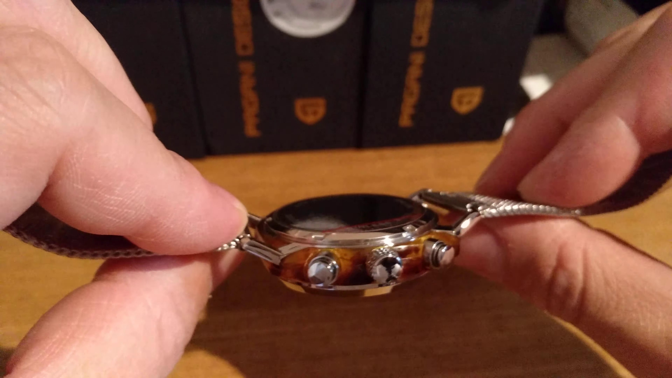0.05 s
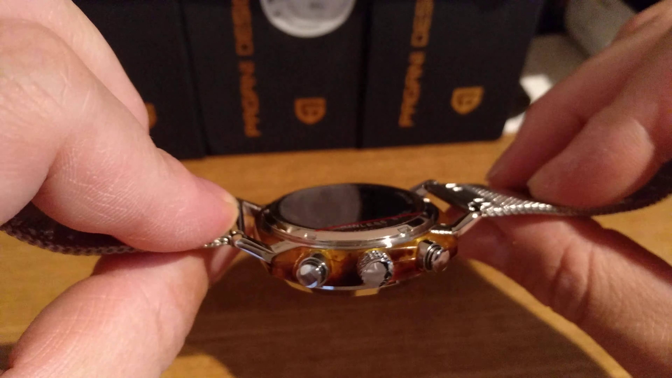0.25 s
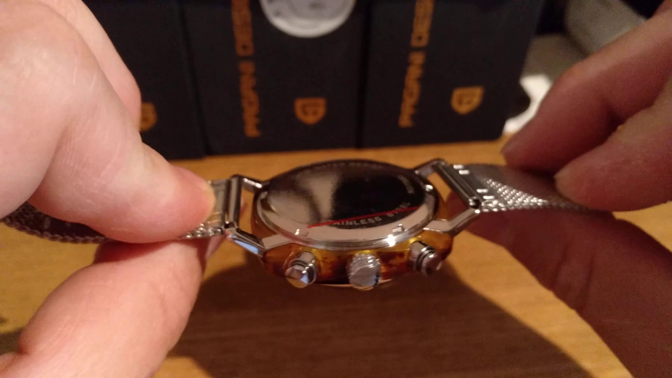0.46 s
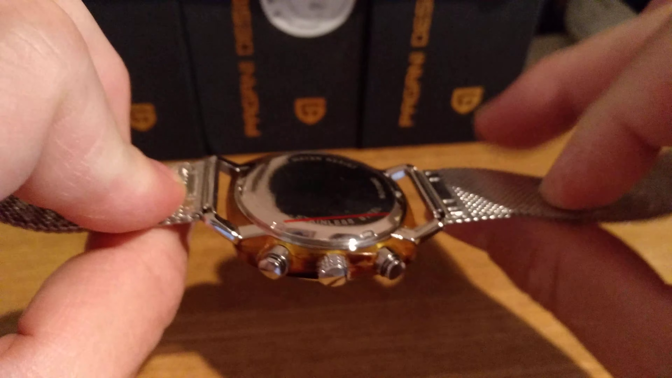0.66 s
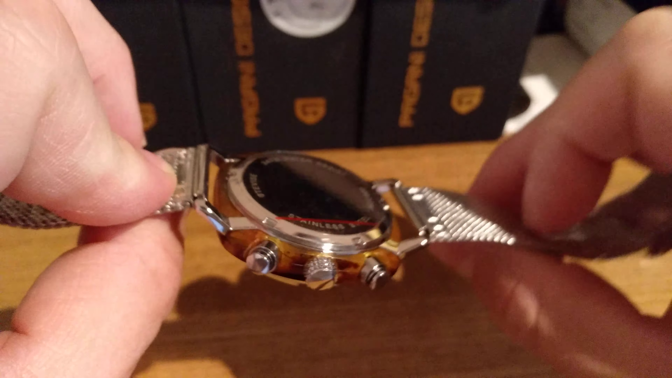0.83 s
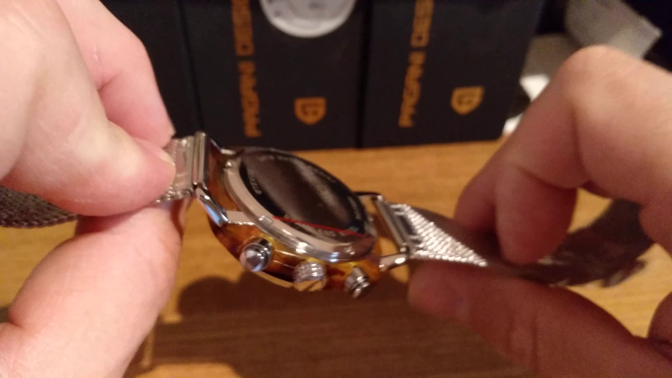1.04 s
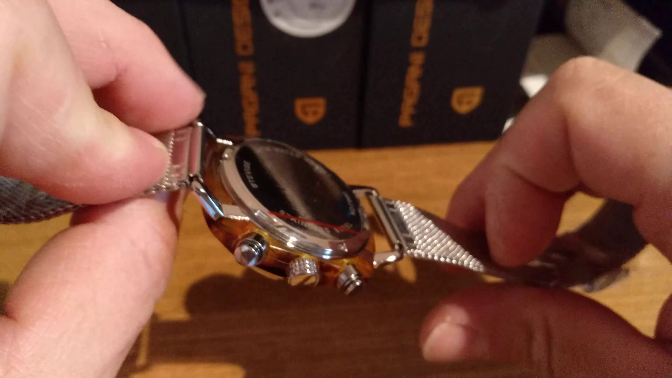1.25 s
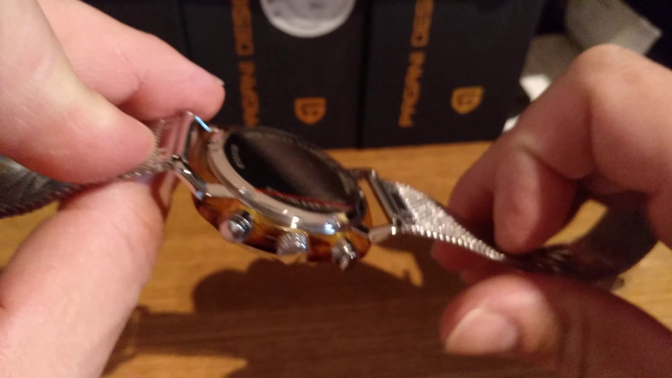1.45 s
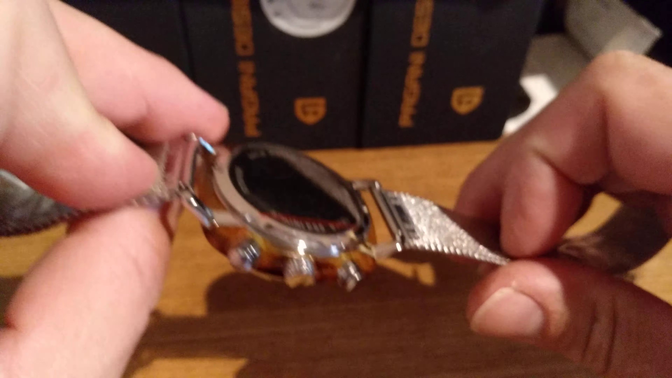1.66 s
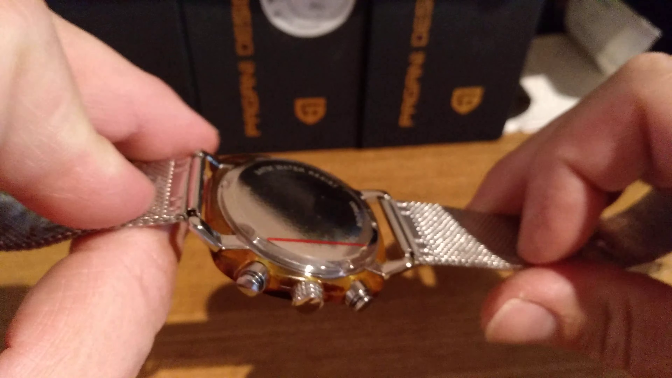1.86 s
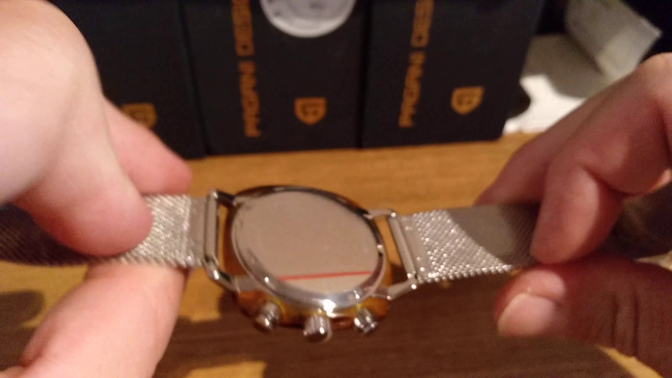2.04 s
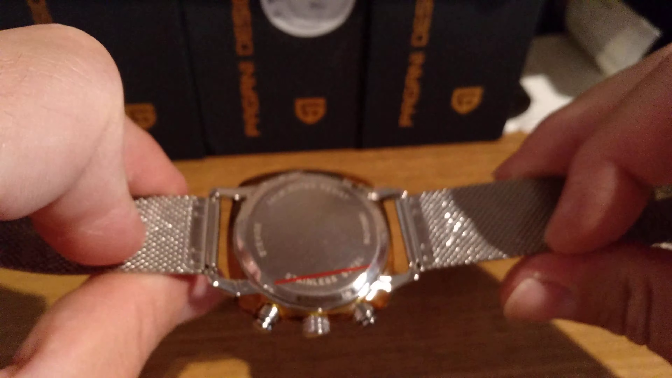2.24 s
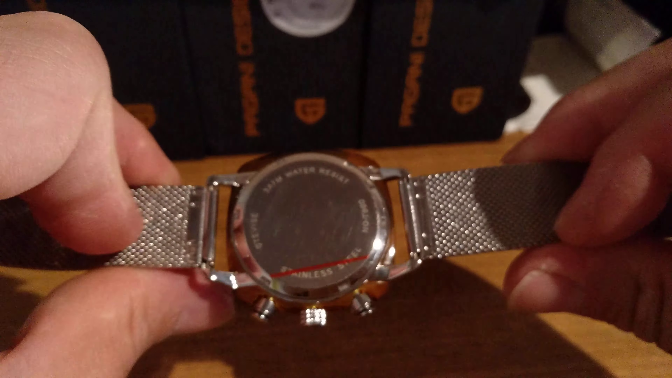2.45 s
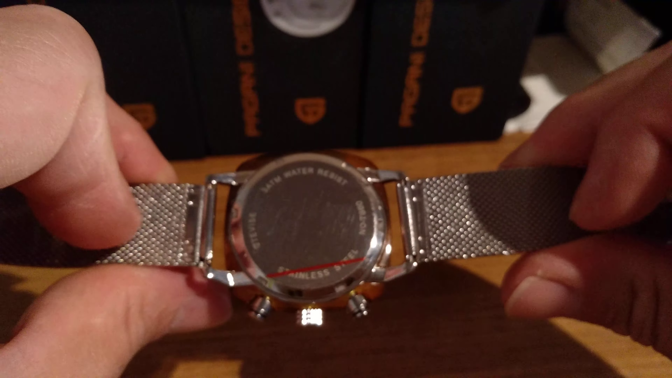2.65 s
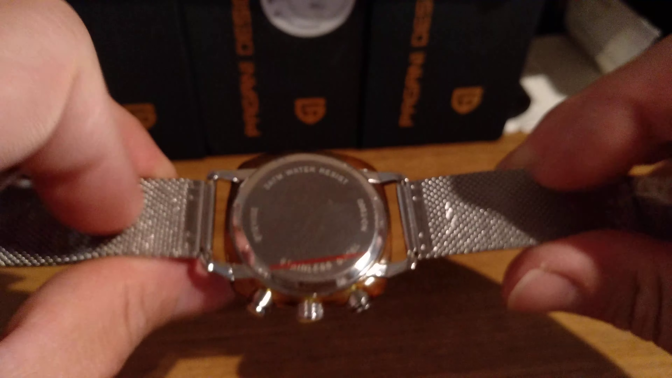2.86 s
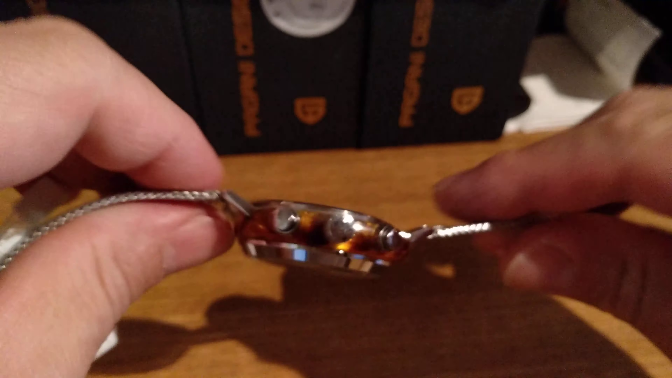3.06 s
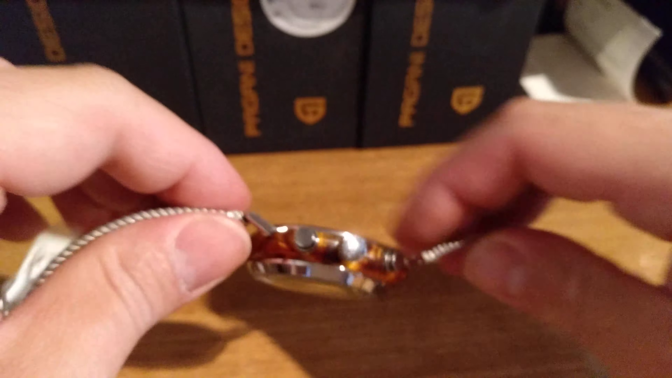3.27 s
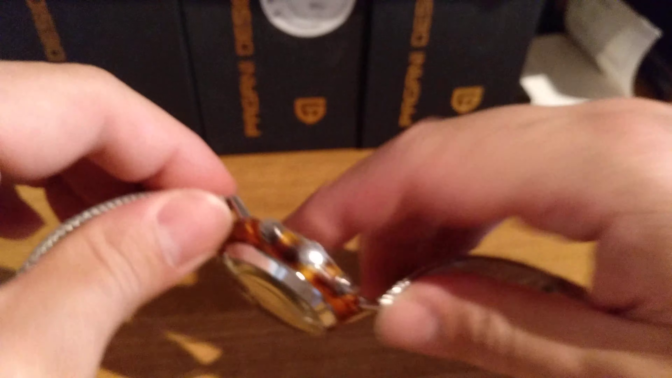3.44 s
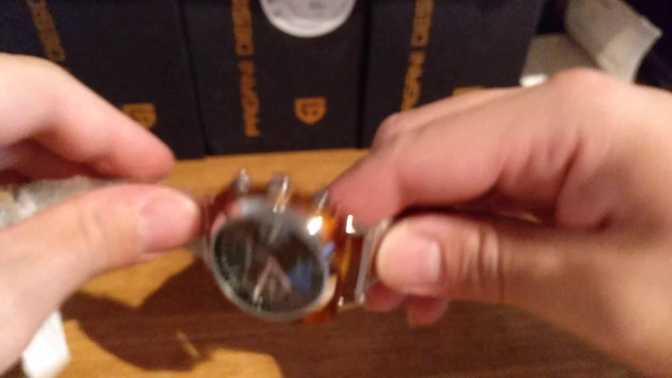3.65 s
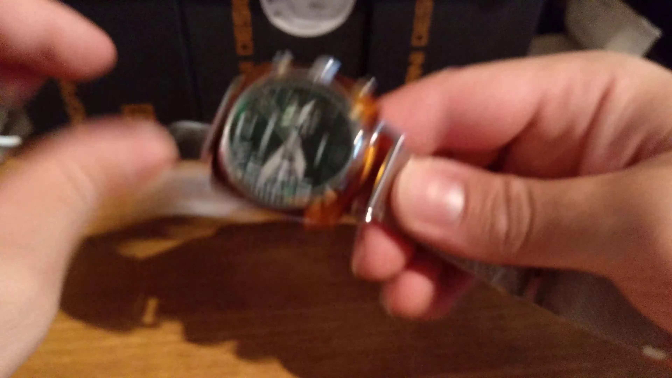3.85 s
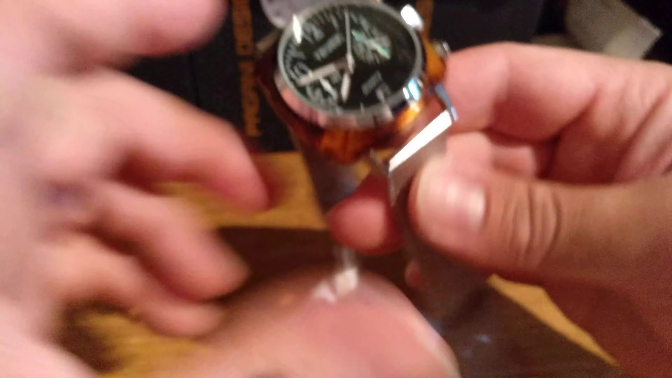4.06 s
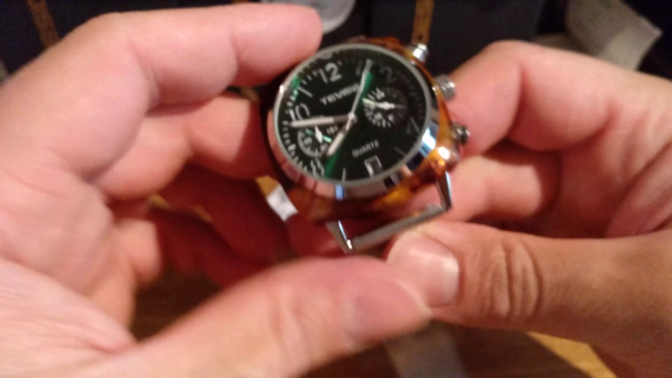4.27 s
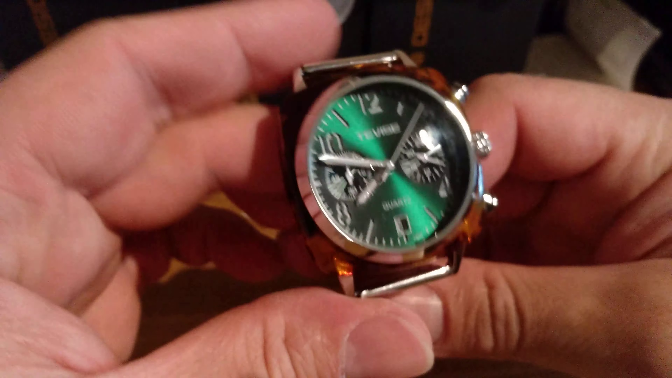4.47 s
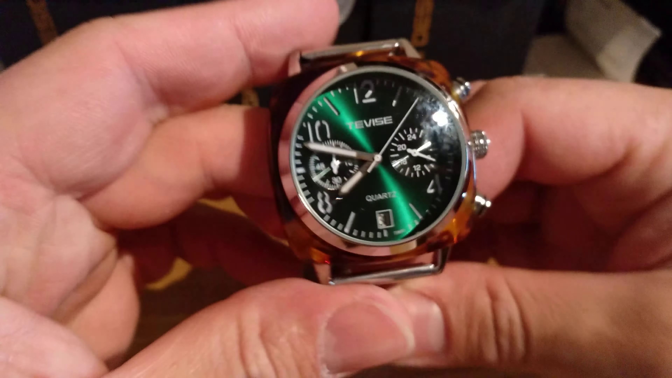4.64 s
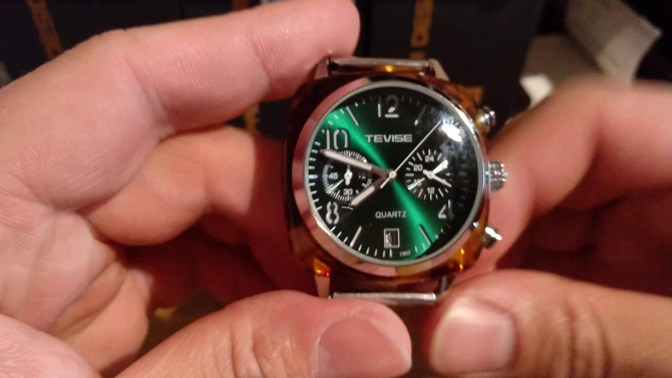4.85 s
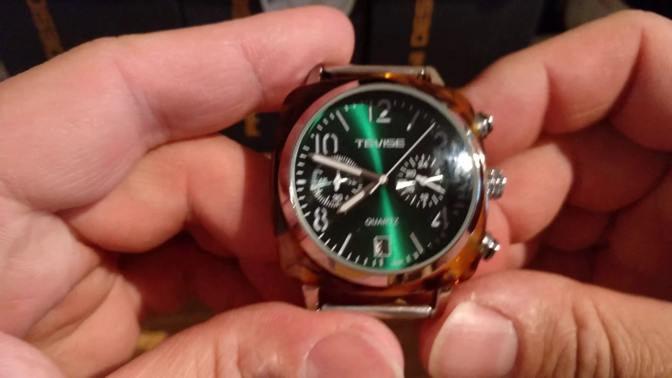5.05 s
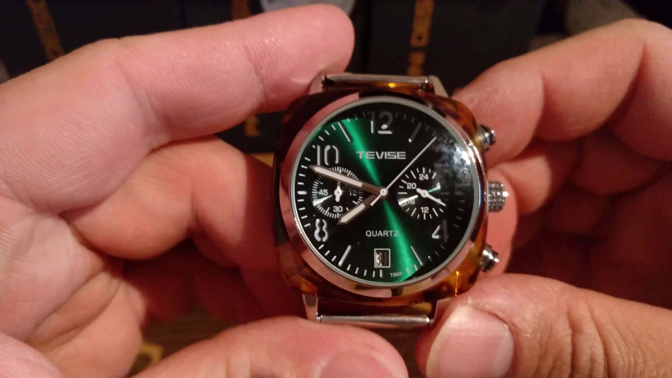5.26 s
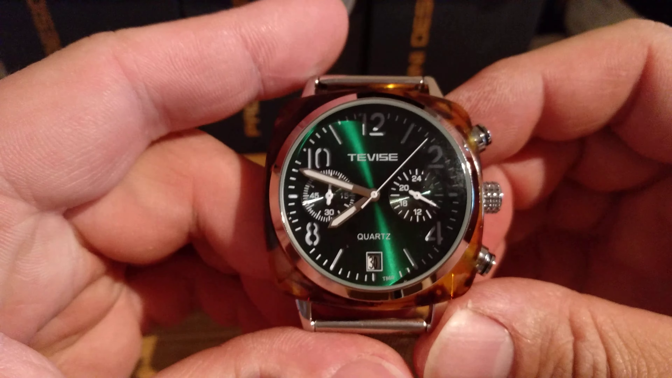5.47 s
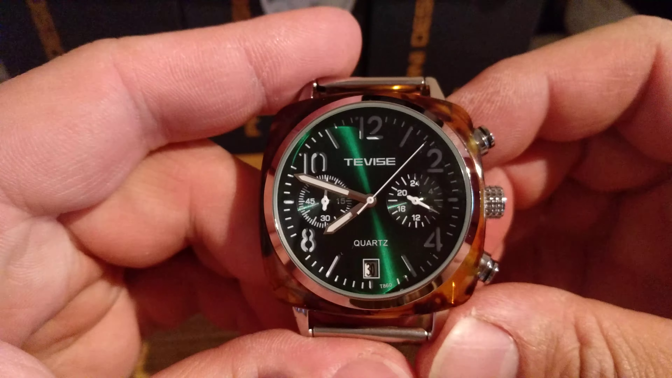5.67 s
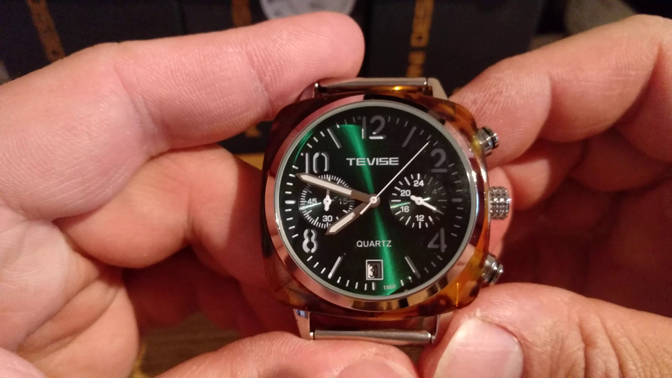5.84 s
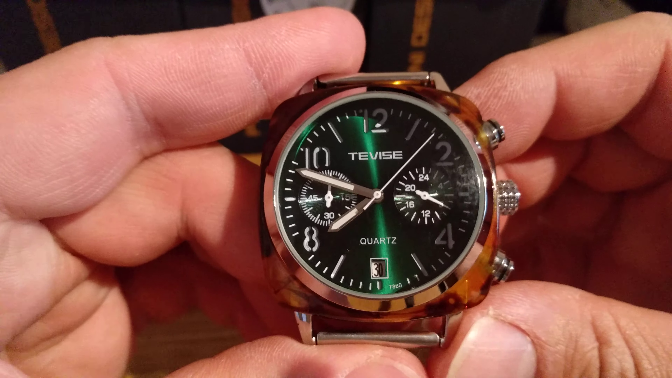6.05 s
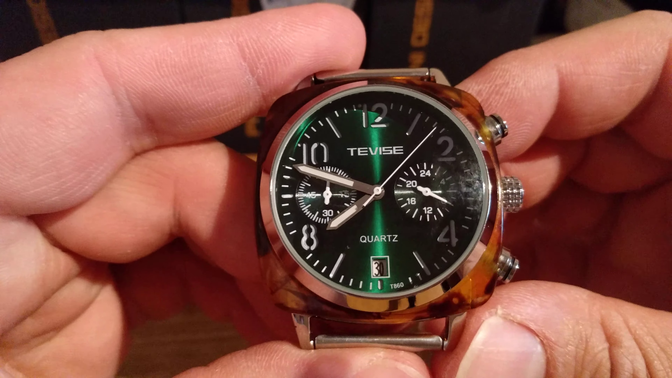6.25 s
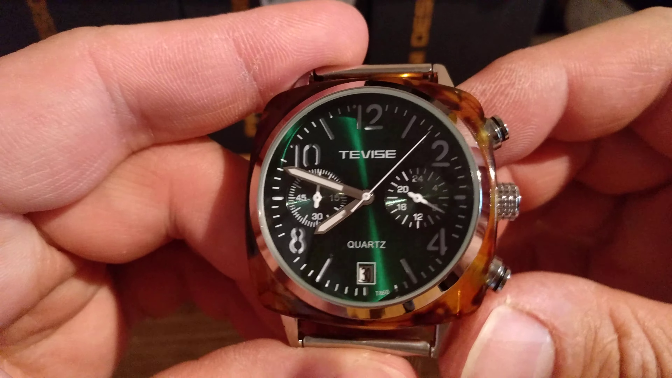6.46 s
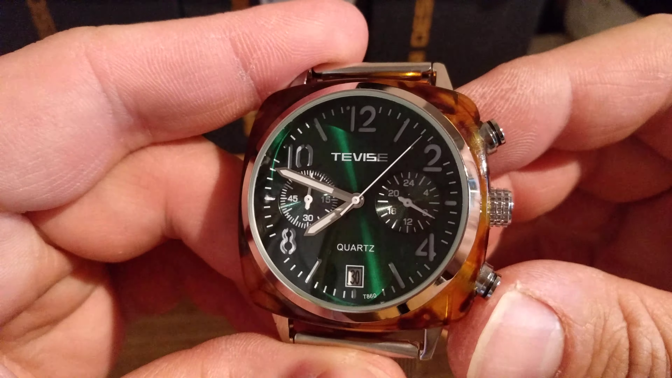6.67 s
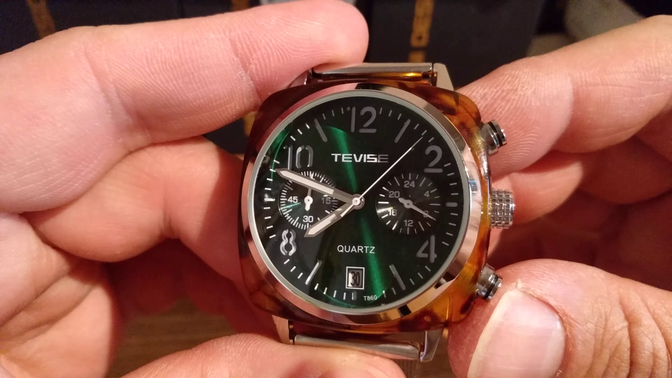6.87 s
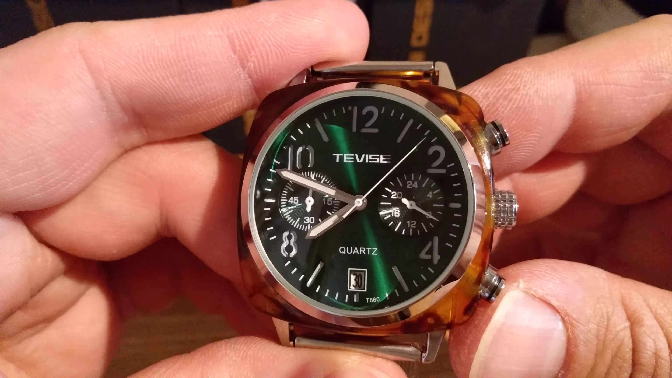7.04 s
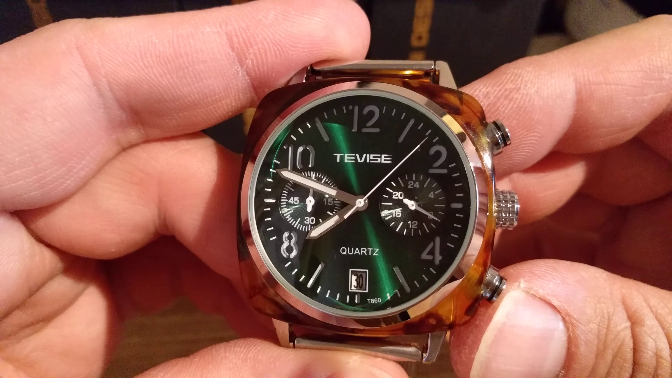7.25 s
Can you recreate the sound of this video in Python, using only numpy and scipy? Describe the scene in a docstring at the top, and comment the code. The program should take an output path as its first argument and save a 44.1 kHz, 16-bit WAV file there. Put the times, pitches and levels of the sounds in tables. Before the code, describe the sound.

Close up in a quiet room, a metal watch on a mesh strap is handled. Light, thin ticks come irregularly, with one sharp click around two seconds. After a lull the links rustle and swish, building to loud bright clinks and soft thumps just past four seconds. The clasp scrapes briefly on wood, then faint dull rubs and sparse ticks fade into steady hush.

```python
"""A metal wristwatch on a mesh bracelet is turned over in two hands, close to a phone in a quiet room. Its
links tick and rustle: short bursts of noise and showers of tiny clicks, coloured like thin metal. The loose
clasp knocks, drags and rubs on a wooden table: noise and small slips drive resonances. Rubbed links sing on a
few high modes, the dragged clasp on one near 2.6 kHz, and soft thumps come from hand and clasp on the table.
Behind it lie a short echo of shaped noise, a steady hush and a few wavering low tones."""
import sys
import numpy as np
from scipy import signal
from scipy.fft import rfft, irfft, next_fast_len
from scipy.io import wavfile
from scipy.ndimage import uniform_filter1d

SR = 44100
rng = np.random.default_rng(int(sys.argv[2]) if len(sys.argv) > 2 else 0)


def int16_out(signal):
    """Quantize to a 16-bit WAV file."""
    q = np.round(np.clip(np.atleast_2d(signal).T, -1, 1) * 32767)
    wavfile.write(sys.argv[1], SR, q.astype(np.int16))


N = 322191  # length in samples


def undb(db):
    """Turn decibels into a gain."""
    return 10 ** (np.asarray(db) / 20)


def unit(x):
    """Scale a sound to an rms level of 1."""
    return x / np.sqrt(np.mean(x ** 2))


def curve(rows):
    """Gain over time from rows of seconds and dB, silent outside them."""
    s, db = np.transpose(rows)
    return undb(np.interp(np.arange(N) / SR, s, db, left=-np.inf, right=-np.inf))


def colour(x, points):
    """Shape the spectrum with gains in dB, joined by straight lines over log frequency."""
    size = next_fast_len(len(x))
    hz, db = np.transpose(points)
    log_hz = np.log(np.fft.rfftfreq(size, 1 / SR) + 1)  # + 1 avoids the log of zero
    gain = undb(np.interp(log_hz, np.log(hz), db))
    return irfft(rfft(x, size) * gain, size)[:len(x)]


def band(x, hz, width_hz):
    """Keep the sound around one frequency with a two-pole band-pass."""
    b, a = signal.iirpeak(min(hz, SR / 2.2), hz / width_hz, fs=SR)
    return signal.lfilter(b, a, x)


def ring(x, modes, gain):
    """Let x strike a set of modes, each a sine that dies away, and add them up."""
    out = 0
    for (hz, db, t60), g in zip(modes, gain):
        fall = np.log(1000) / (t60 * SR)  # 60 dB down after t60 seconds
        pole = np.exp(2j * np.pi * hz / SR - fall)
        out = out + g * undb(db) * signal.lfilter([1], [1, -pole], x).imag
    return out


def grains(rate, scatter_db):
    """Random tiny impacts, so many per second, their strengths spread over scatter_db."""
    hit = rng.random(N) < rate / SR
    sign = rng.choice([-1, 1], N)
    return hit * sign * undb(scatter_db * rng.random(N) ** 2)


def add(track, s, sound):
    """Mix a sound into the track at time s in seconds."""
    i = int(s * SR)
    track[i:i + len(sound)] += sound[:N - i]


def wander(hold_s):
    """Slow random drift with an rms of 1."""
    k = int(hold_s * SR)
    once = uniform_filter1d(rng.standard_normal(N), k)
    return unit(uniform_filter1d(once, k))


ATTACK_S = 0.0028  # of every stroke


def stroke(start, hold, db, t60):
    """Gain of one stroke: a straight attack, a hold, then a release of 60 dB in t60 seconds."""
    t = np.arange(N) / SR - start
    release_s = np.clip(t - ATTACK_S - hold, 0, None)
    return undb(db - 60 * release_s / t60) * np.clip(t / ATTACK_S, 0, 1)


# Single ticks of metal on metal. Each row: start in seconds, peak level of the crack in dB,
# centre of its pitch in Hz, level of the clasp in dB against the crack.
METAL_TICKS = [(0.5313, -40, 9650, -11.5), (0.808, -35, 11300, -24), (0.8152, -34, 9930, -25),
               (0.9386, -38, 11300, -22), (0.9668, -33, 14200, -13.5), (0.974, -31.5, 12000, -20),
               (1.111, -40.5, 9600, -20), (1.164, -33.5, 9300, -12), (1.27, -40.5, 7300, -35),
               (1.369, -35.5, 10900, -20), (1.398, -32, 9400, -13.5), (1.465, -28.5, 8900, -28),
               (1.7384, -33, 11100, -24), (1.756, -37, 10800, -38), (1.7662, -28.5, 11000, -37),
               (1.7826, -29, 10900, -30), (1.8213, -30.5, 9600, -20), (2.051, -9.5, 11950, -64),
               (2.0657, -32, 12000, -38), (2.2796, -40, 9300, -32), (3.0465, -34, 9200, -25),
               (3.0596, -30.5, 9500, -17.5), (3.1418, -31, 7240, -25), (3.2181, -36, 9420, -38),
               (3.241, -31.5, 10300, -39), (3.3165, -27, 8940, -18), (3.329, -29.5, 10900, -12),
               (3.571, -36.5, 12600, -9), (3.6759, -35, 10400, -23), (3.7193, -21.5, 14000, -59),
               (3.78, -27, 8700, -48), (3.8408, -25, 11100, -51), (3.928, -32, 9400, -28),
               (4.0133, -18, 7600, -46), (4.0146, -6.5, 9400, -41), (4.019, -14.5, 12100, -27),
               (4.0517, -18.5, 9140, -22), (4.095, -30, 12700, 1), (4.22, -25, 8550, -23),
               (4.2332, -23, 12900, -24), (4.255, -19.5, 11100, -21), (4.346, -23, 10400, -19),
               (4.3497, -6, 11400, -33), (4.3762, -13, 8600, -41), (4.467, -26.5, 12200, -23),
               (4.5118, -22.5, 10100, -7), (4.567, -28, 9500, -20), (4.59, -31, 8160, -20),
               (4.6034, -33.5, 8400, -30), (4.6197, -32, 12000, -30), (4.6373, -32.5, 12200, -28),
               (4.7184, -21, 4200, -17), (4.741, -21.5, 4200, -18), (4.8253, -23, 5250, -7.5),
               (4.842, -31.5, 12600, -7), (5.03, -49.5, 3220, 3.5), (5.0918, -36.5, 9400, -1.5),
               (5.135, -34, 10600, -23), (5.166, -36.5, 10400, -20), (5.4905, -45, 4140, 1.5),
               (5.784, -40.5, 9700, -30), (5.86, -56.5, 3310, 7.5), (6.1502, -36, 13500, -30),
               (6.974, -30, 5250, -40)]
# How the clasp rings when hit. Each row: frequency in Hz, strength in dB, time to fall by 60 dB in seconds.
CLASP_RING = [(1930, -21, 0.0035), (2620, 5.5, 0.016), (2727, -1, 0.019), (3330, 7, 0.01),
              (4226, 6.5, 0.013), (5140, 4, 0.01), (6250, -1, 0.015), (8330, -4.5, 0.015)]
# How the thin mesh colours a noise. Each row: frequency in Hz, gain in dB.
MESH_TONE = [(1500, -10.5), (3300, -8.5), (4700, -5), (6500, -4), (8000, -1.5), (10000, 2), (13000, -2.5),
             (16000, 0.5)]


def ticks(width=0.13, pitch_db=10.5, contact_s=0.0019, rise_s=0.00019, thin=0.29):
    """A rough contact of a millisecond or two: a pitched crack, the clasp's ring and its dull knock."""
    out, t = np.zeros(N), np.arange(8192) / SR
    noise = rng.standard_normal((len(METAL_TICKS), len(t)))
    spot = rng.random((len(METAL_TICKS), len(CLASP_RING)))  # where the blow lands on the clasp
    for (s, db, hz, clasp_db), n, g in zip(METAL_TICKS, noise, spot):
        contact = n * (1 - np.exp(-t / rise_s)) * np.exp(-t / contact_s)
        b, a = signal.butter(1, thin * hz, "high", fs=SR)
        crack = signal.lfilter(b, a, contact)  # small parts lack lows
        pitch = undb(pitch_db) * band(contact, hz, width * hz)
        parts = [(colour(crack + pitch, MESH_TONE), 0),
                 (ring(contact, CLASP_RING, .5 + g), clasp_db),
                 (band(contact, 3100, 2700), clasp_db)]  # the dull knock
        add(out, s, sum(undb(db + rel) * v / np.abs(v).max() for v, rel in parts))
    return out


# The mesh slides and bends, with the level gliding from row to row.
# Each row: time in seconds, level of the link clicks in dB.
RUSTLE_LEVEL = [(0, -65.5), (.45, -68.5), (.58, -62.5), (1.05, -61.5), (1.4, -66.5), (2.0, -61.5),
                (2.5, -68), (2.9, -70.5), (2.98, -53), (3.36, -61), (3.5, -57), (4.04, -54.5), (4.12, -47),
                (4.3, -46.5), (4.47, -69), (4.67, -65), (4.73, -54), (4.84, -55), (4.87, -61.5),
                (5.45, -66), (7.3, -87)]
# Quick slides of the mesh over itself. Each row: middle in seconds, level in dB,
# half length in seconds, share of the lower hiss in dB.
MESH_SWISHES = [(0.751, -50.5, 0.0072, -8), (1.773, -57, 0.018, -21), (1.832, -49, 0.0098, -24),
                (2.093, -63, 0.013, 6), (3, -52.5, 0.011, -3), (3.07, -58, 0.013, -2),
                (3.344, -49, 0.081, -18), (3.757, -37, 0.0095, -11.5), (3.786, -55, 0.0098, -10),
                (3.911, -44, 0.013, -10), (4.196, -39, 0.023, -21), (4.263, -48, 0.011, -15),
                (4.352, -32.5, 0.0076, -24), (4.385, -38, 0.025, -29), (4.514, -43.5, 0.0024, 11),
                (4.577, -46, 0.0082, -12)]


def rustle(hiss_db=-2, click_s=0.00051, grit=0.68):
    """Many links click, each in its own pitch region, over the hiss of wire sliding on wire."""
    t = np.arange(N) / SR
    decay = np.exp(-1 / (click_s * SR))
    links = 0
    for hz in (5250, 7800, 10500, 11700, 15100):
        hits = grains(110, 18.0)
        contact = signal.lfilter([1], [1, -decay], hits) * rng.standard_normal(N)  # scraped, not clean
        links = links + band(contact, hz, .8 * hz)
    links = unit(colour(links, MESH_TONE))
    wire = unit(colour(rng.standard_normal(N), MESH_TONE))
    # a harder slide reaches further down
    lower = unit(band(band(rng.standard_normal(N), 6100, 5300), 6100, 5300))
    out = (links + undb(hiss_db) * wire) * curve(RUSTLE_LEVEL)
    for s, db, half, lower_db in MESH_SWISHES:
        swell = undb(db) * np.exp(-((t - s) / half) ** 2)
        out += swell * (grit * links + wire + undb(lower_db) * lower)
    return out


# The clasp drags on the wood in short strokes. Each row: start in seconds, hold in seconds,
# level in dB, time for the release to fall by 60 dB in seconds.
DRAG_STROKES = [(4.102, .004, -45, 0.06), (4.51, 0.03, -41.5, 0.085), (4.7137, 0.011, -39, 0.065),
                (4.736, 0.015, -40.5, 0.075), (4.764, 0.0089, -43, 0.073), (4.786, .008, -42, 0.04),
                (4.802, 0.0057, -39.5, .04), (4.811, 0.019, -41.5, 0.032), (4.838, .006, -45, 0.05)]


def drag(scrape_db=-3, smooth=1.15):
    """Stick and slip of the clasp on wood grain rings its modes, with a scraping hiss beside them."""
    slips = unit(unit(grains(326, 5.4)) + smooth * rng.standard_normal(N))
    gain = np.ones(len(CLASP_RING))
    push = sum(stroke(*row) for row in DRAG_STROKES)
    loud = np.std(ring(slips, CLASP_RING, gain))  # level of the ring under a steady push
    ringing = ring(slips * push, CLASP_RING, gain) / loud
    scrape = unit(band(band(slips, 5700, 5200), 7300, 11000))
    return ringing + undb(scrape_db) * push * scrape


# A duller, softer rub on the wood. Each row: start in seconds, hold in seconds, level in dB,
# time for the release to fall by 60 dB in seconds, tilt towards the treble in dB per octave.
RUB_STROKES = [(4.969, 0.072, -59.5, 0.075, 2), (5.139, 0.014, -54, .05, 4), (5.365, 0.15, -63.5, .05, -7),
               (5.488, 0.0032, -46, 0.025, -1.5), (5.498, 0.047, -55, 0.062, -9),
               (5.546, 0.084, -54.5, .025, 0.5)]
# Broad resonances of the rub. Each row: frequency in Hz, width in Hz, level in dB before the tilt.
RUB_RESONANCES = [(450, 590, -18), (1320, 640, 1), (2100, 550, 0.5), (2600, 390, 0), (3950, 720, -5.5)]


def rub():
    """Dense small slips through broad, damped resonances, each coming and going."""
    slips = grains(2700, 11.0)
    hz, _, db = np.transpose(RUB_RESONANCES)
    peaks = []
    for f, w, _ in RUB_RESONANCES:
        resonance = unit(band(band(slips, f, w), f, 2 * w))
        peaks.append(undb(3 * wander(0.02)) * resonance)
    peaks = np.array(peaks)
    out = 0
    for *shape, tilt in RUB_STROKES:
        mix = undb(db + tilt * np.log2(hz)) @ peaks
        out = out + unit(mix) * stroke(*shape)
    return out


# Rubbed links sing on high modes, and the dragged clasp on one near 2.6 kHz. Each row: start in seconds, hold
# in seconds, level in dB, # time for the release to fall by 60 dB in seconds, frequency in Hz, filter width in
# Hz.
SINGING_MODES = [(2.052, .002, -43, 0.079, 11850, 400), (4.094, 0.006, -46.5, 0.3, 2590, 150),
                 (4.138, 0.018, -47, .08, 12870, 120), (4.193, 0.0053, -39, 0.11, 12870, 121),
                 (4.23, .07, -48, 0.12, 12870, 120), (4.375, 0.024, -35, 0.09, 8300, 700)]


def sing():
    """Narrow modes, most of them high, kept going by rubbing."""
    rubbing = unit(grains(570, 9.8)) + 1.8 * rng.standard_normal(N)
    out = 0
    for *shape, hz, w in SINGING_MODES:
        tone = unit(band(band(rubbing, hz, w), hz, 2 * w))
        out = out + tone * stroke(*shape)
    return out


# Soft thumps and dull knocks of hand and clasp on the table.
# Each row: start in seconds, peak level in dB, centre in Hz.
TABLE_THUMPS = [(4.051, -33, 1790), (4.063, -41, 810), (4.066, -41, 292), (4.344, -48, 332),
                (4.518, -52, 220), (4.604, -45.5, 108), (4.844, -48, 203), (5.489, -45, 800)]


def thumps(length_s=0.0073, width=0.55):
    """A soft uneven push on the table top, which barely rings; lower knocks last longer."""
    out, t = np.zeros(N), np.arange(8192) / SR
    noise = rng.standard_normal((len(TABLE_THUMPS), len(t)))
    for (s, db, hz), n in zip(TABLE_THUMPS, noise):
        u = t / length_s * np.sqrt(hz / 300)  # length_s holds at 300 Hz
        push = n * u * np.exp(-u)
        body = band(band(push, hz, width * hz), hz, hz)
        add(out, s, undb(db) * body / np.abs(body).max())
    return out


ROOM_DB, ROOM_T60_S = -13, 0.43  # echo level, and the time it takes to fall by 60 dB


def room(x, delay_s=0.0078):
    """Table and walls return a short diffuse tail: noise that dies away after a small delay."""
    t = np.arange(SR // 2) / SR
    fall = np.exp(-np.log(1000) * t / ROOM_T60_S)
    tail = rng.standard_normal(len(t)) * fall * (t > delay_s)
    tail = tail / np.sqrt(np.sum(tail ** 2))
    return undb(ROOM_DB) * signal.fftconvolve(x, tail)[:N]


# Colour of the steady room tone. Each row: frequency in Hz, gain in dB before the overall level is set.
HUSH_TONE = [(25, -9), (70, -17), (97, -9), (130, -19), (210, -7), (300, -8), (400, -6), (660, -11),
             (980, -7), (1600, -17), (2500, -20), (6000, -23), (10000, -21), (16000, -25)]
HUSH_DB = -58  # rms
# Wavering low tones in the room. Each row: frequency in Hz, width in Hz, rms level in dB before the waver.
LOW_TONES = [(175, 79, -69.5), (214.6, 5.5, -75.5), (319.5, 9, -74.5), (403.8, 4.6, -73.5)]


def hush(waver_db=3.5):
    """Steady room tone with microphone hiss, and narrow bands of noise as wavering low tones."""
    drones = 0
    for hz, w, db in LOW_TONES:
        level = undb(db + waver_db * wander(0.33))
        drones = drones + level * unit(band(rng.standard_normal(N), hz, w))
    steady = unit(colour(rng.standard_normal(N), HUSH_TONE))
    return steady * undb(HUSH_DB) + drones


def scene():
    """Watch and table close by, their echo, the room tone."""
    watch = ticks() + rustle() + drag() + rub() + sing() + thumps()
    return (watch + room(watch) + hush())[None]


TOP_HZ = 15800


def record(dry):
    """The phone cuts the top: a steep low-pass at TOP_HZ."""
    low_pass = signal.ellip(10, .2, 60, TOP_HZ, fs=SR, output="sos")
    return signal.sosfilt(low_pass, dry)


dry = scene()
out = record(dry)
int16_out(out)
```